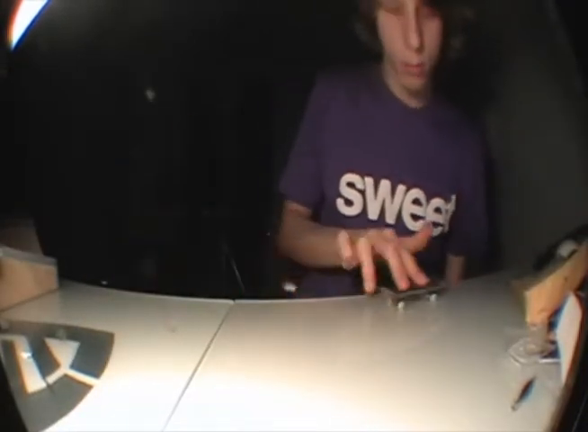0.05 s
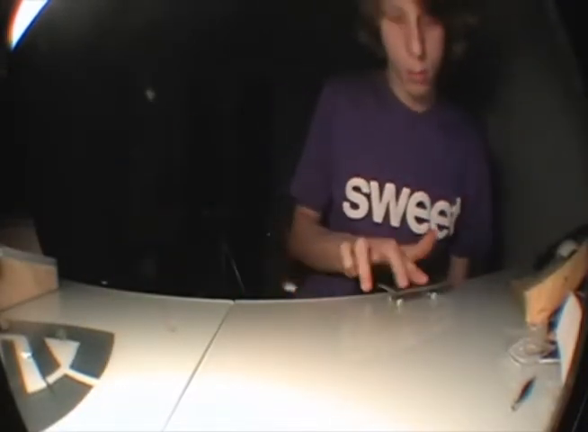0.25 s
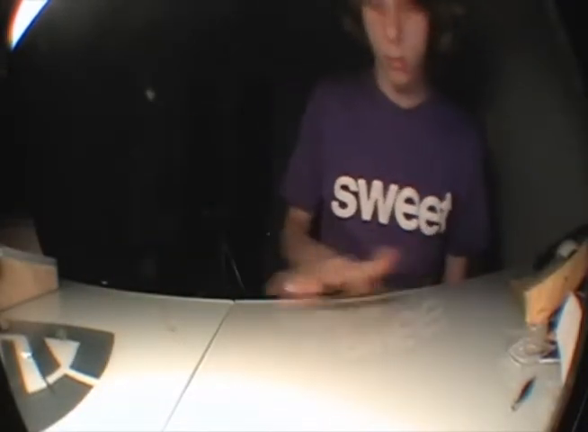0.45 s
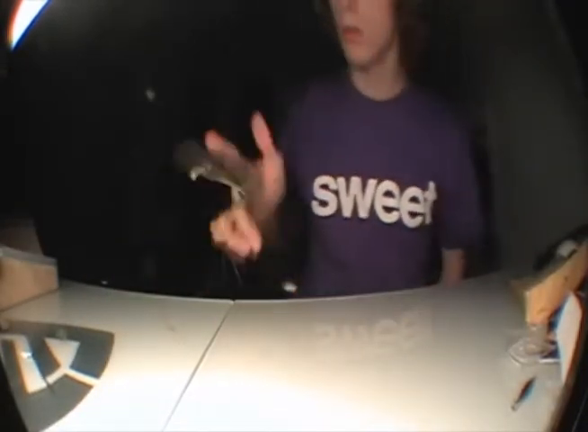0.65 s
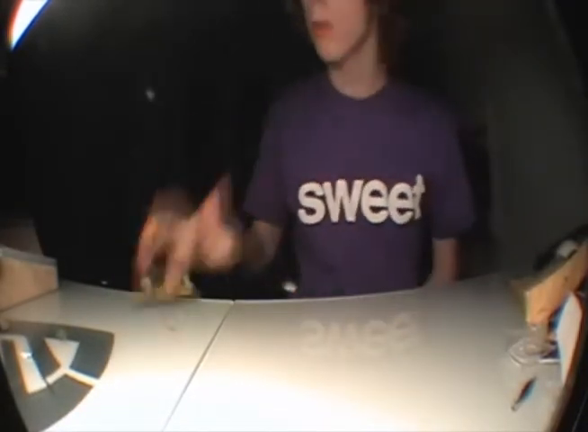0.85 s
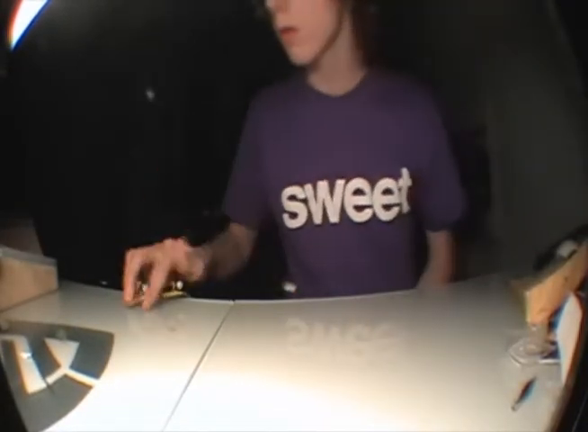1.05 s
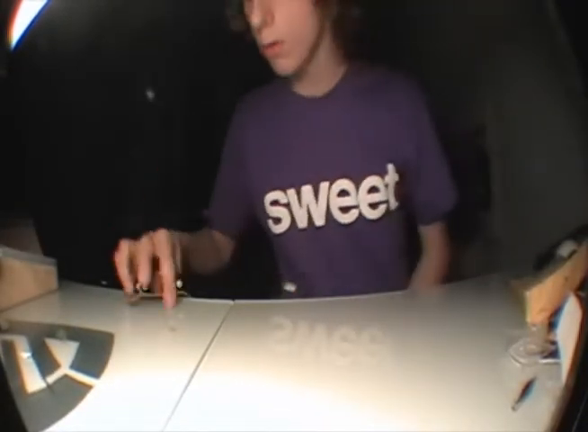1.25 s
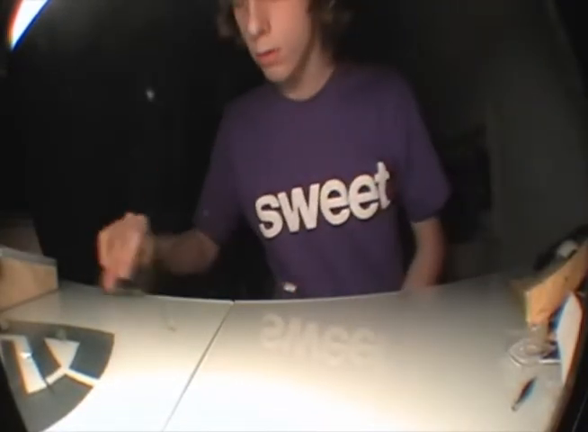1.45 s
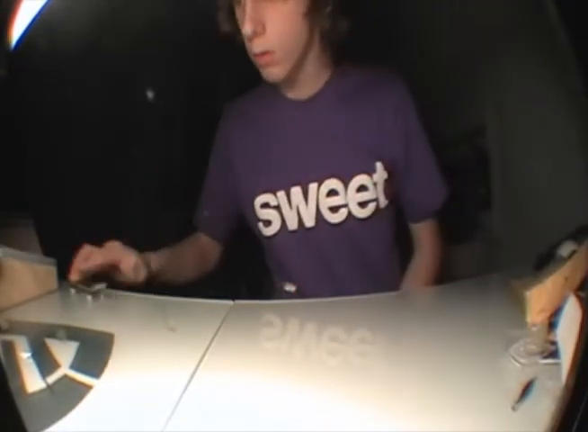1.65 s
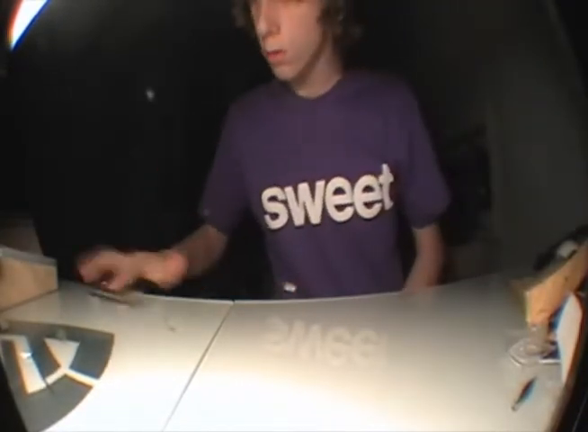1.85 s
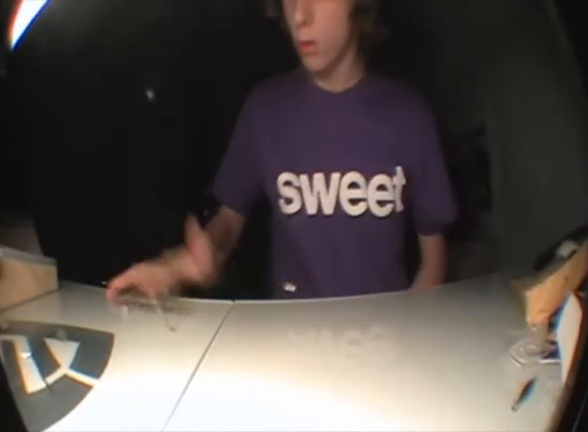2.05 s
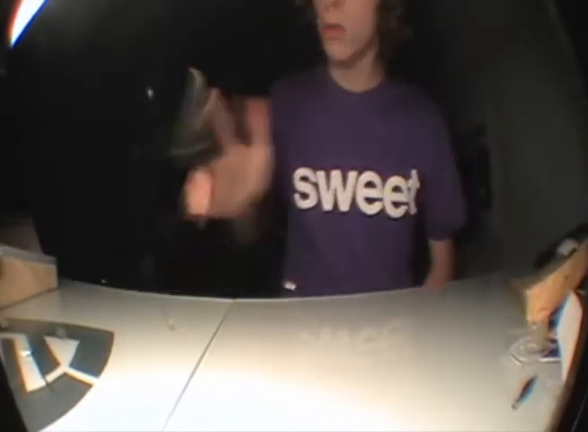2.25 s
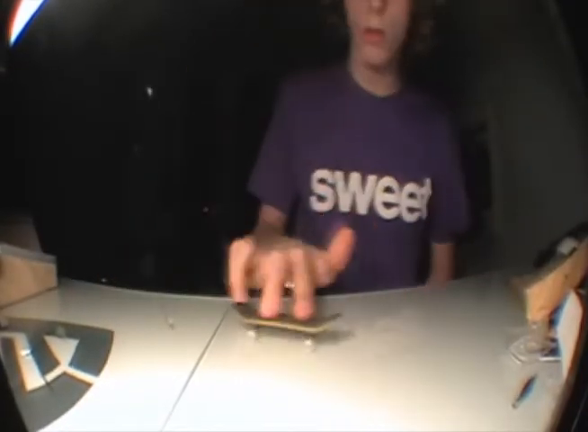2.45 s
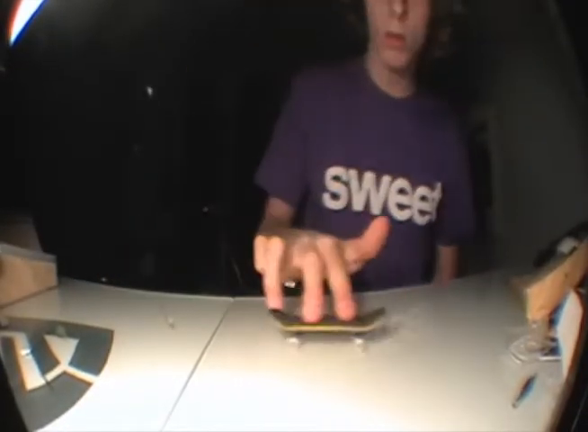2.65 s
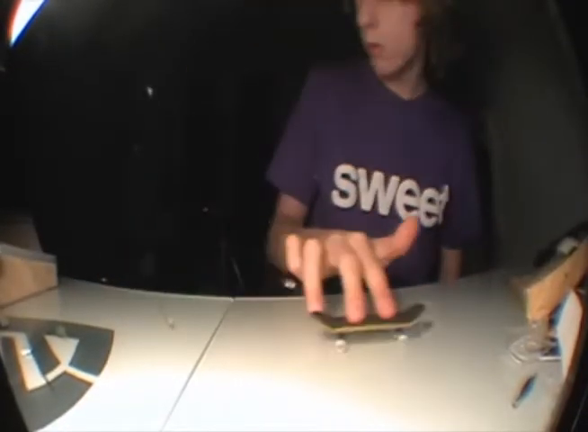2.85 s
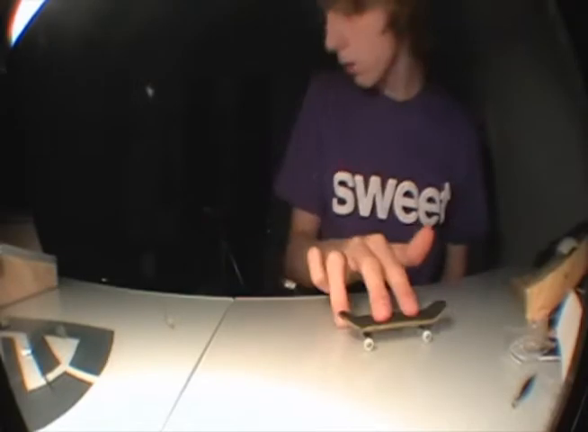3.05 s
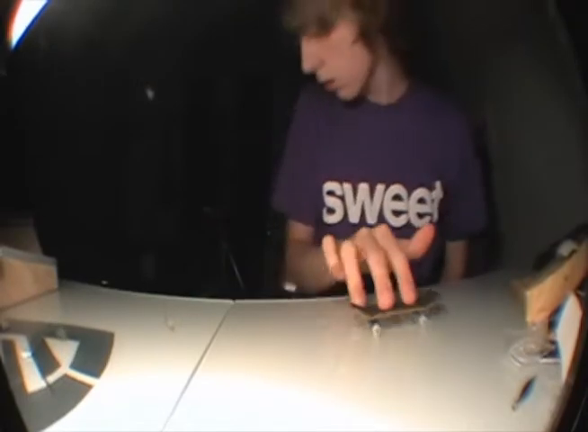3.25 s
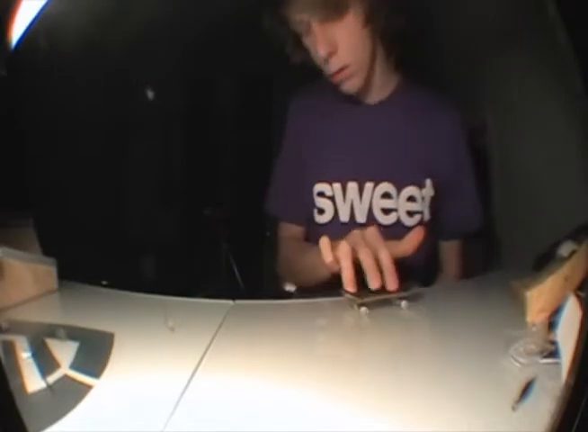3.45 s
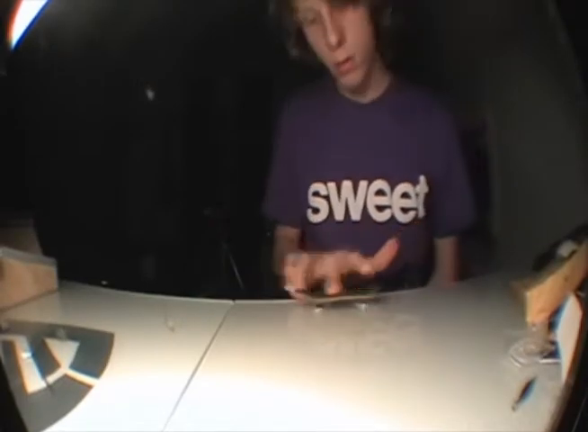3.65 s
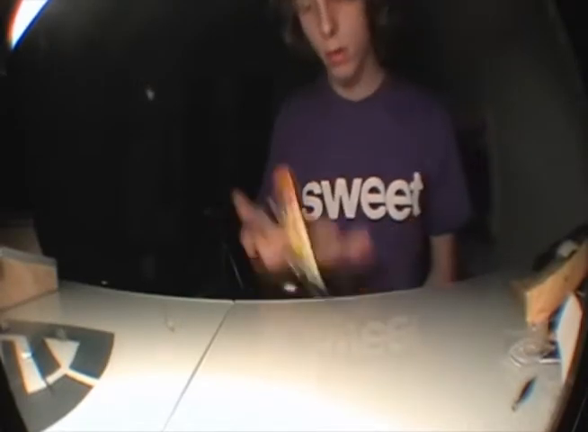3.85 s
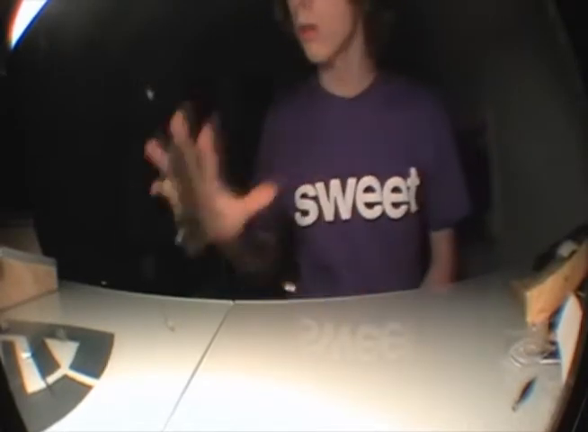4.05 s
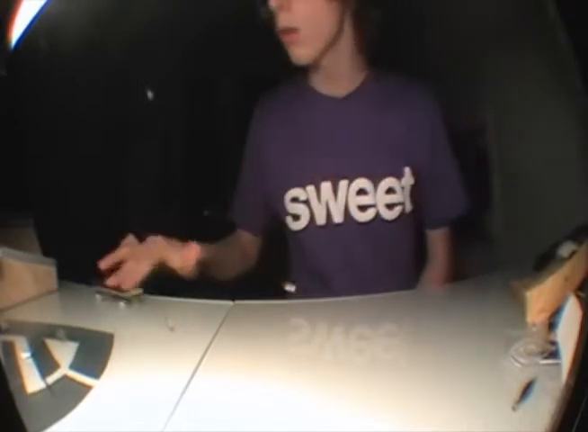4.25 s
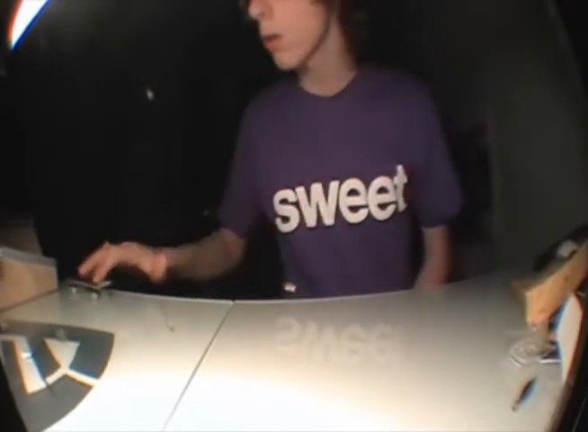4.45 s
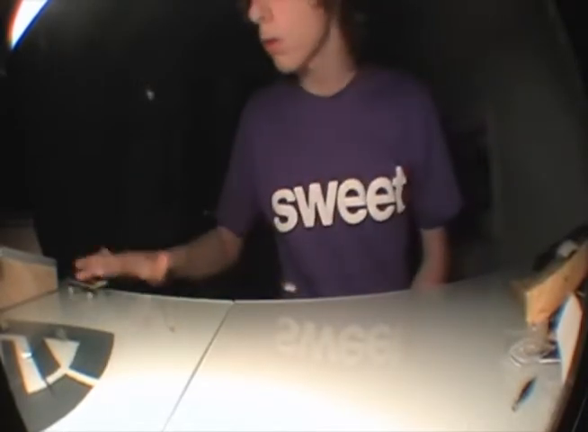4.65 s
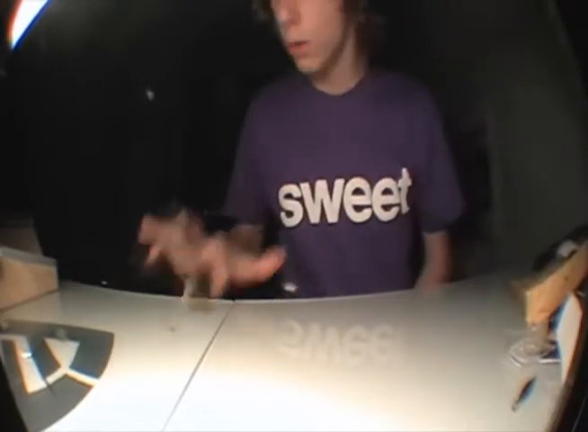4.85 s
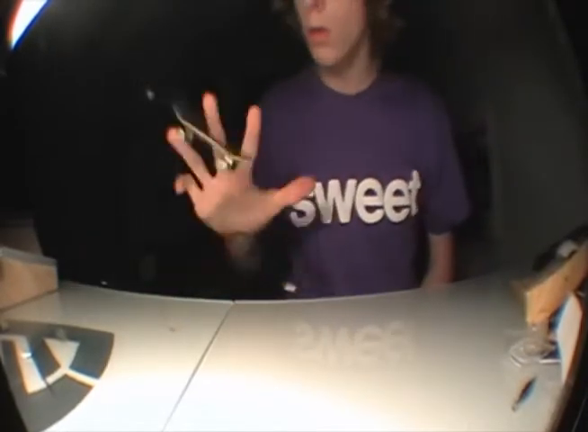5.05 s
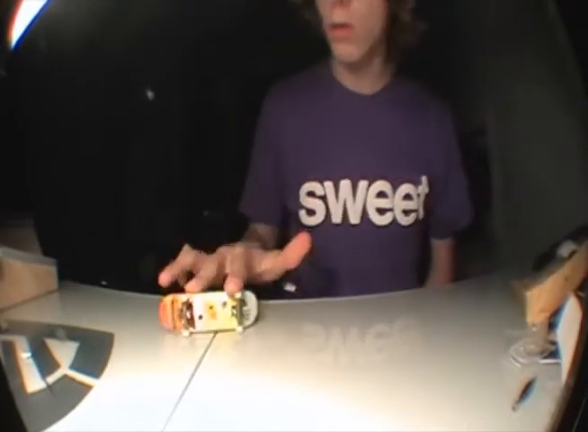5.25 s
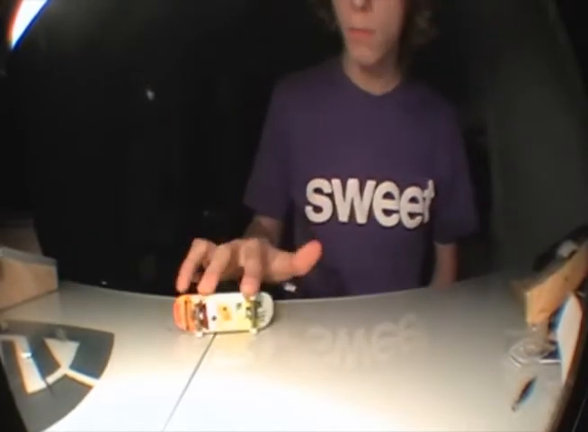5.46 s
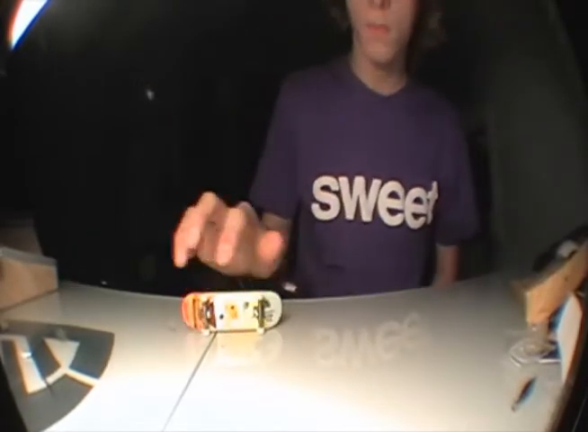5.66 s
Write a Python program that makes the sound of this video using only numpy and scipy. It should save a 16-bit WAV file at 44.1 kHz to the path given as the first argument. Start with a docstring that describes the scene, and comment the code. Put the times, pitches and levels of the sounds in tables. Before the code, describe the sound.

A miniature skateboard is worked by fingers on a hard tabletop, close to the microphone. Wheels growl briefly, swell into a rush, then the tail cracks and the board clatters down. More pops and landings follow, separated by faint rolling and ticking, ending in a hard double clack. A small room answers briefly over a low hum; the loudest hits distort.

```python
"""You hear a tiny skateboard, ridden by two fingers on a tabletop in a small room, close to the microphone.
Its wheels growl and rattle, and rush as the hand speeds up: noise shaped in pitch and loudness.
The wooden tail pops, the board clatters down on its trucks, a palm thumps once and loose parts tick:
ringing tones and noise bursts. The table knocks under the pops and landings, the walls answer,
a low background stays on, and the hardest blows overload the microphone."""
import sys
import numpy as np
from scipy import signal
from scipy.fft import rfft, irfft, next_fast_len
from scipy.io import wavfile
from scipy.ndimage import map_coordinates

SR = 44100
rng = np.random.default_rng(int(sys.argv[2]) if len(sys.argv) > 2 else 0)


def dump(signal):
    """Clip the signal to [-1, 1] and save it as 16-bit WAV at the path in sys.argv[1]."""
    limited = np.clip(np.atleast_2d(signal).T, -1, 1)
    pcm = np.round(limited * 32767).astype(np.int16)
    wavfile.write(sys.argv[1], SR, pcm)


N = 251811
# All dB levels in these tables are relative: the functions below add their own trim to them.

# The wooden deck snaps against the table.
# Each row: start in seconds, overall level in dB, table knock in dB, deck body in dB, crack in dB.
CLACKS = [(0.651, 2, 1, -2, -1), (0.9528, 0.5, -1, 2, 0.5), (0.967, 5.5, 0.5, -1.5, -1.5),
          (0.9733, -4, 2.5, 1.5, -3.5), (0.993, 0.5, 2.5, 3.5, -0.5), (1.6339, -6.5, -2.5, 5.5, -2.5),
          (2.1967, 2, 3, -0.5, -3), (2.201, -6.5, 3.5, 0, -2), (3.9313, 0, -4, 0.5, 0),
          (4.2307, 2.5, 2, 4, 0), (4.9525, -3, 5.5, -10, 0), (5.2967, 2.5, -14, -3, -3.5)]
# Board landings on the trucks (metal axle holders), and one hand-cushioned palm thump at 1.001 s;
# each blow has one leading tone.
# Each row: start in seconds, overall level in dB, table knock in dB, body in dB, crack in dB,
# leading tone in Hz, its level in dB.
SLAMS = [(1.001, -13, 14.5, -4, -5.5, 401, 3), (1.485, -6, 7, -0.5, -1, 738, -9),
         (1.6893, -9.5, -18.5, 0, 1, 1110, -20), (1.692, -12.5, 6, -1.5, 4.5, 1523, -1.5),
         (2.5286, 1, -9.5, 1.5, -2.5, 2455, -5), (2.532, -2, -9.5, 5.5, 9.5, 2330, -4),
         (2.540, -7, -3, -7.5, 2.5, 2173, -3), (4.2611, 3, -6.5, 1, 6.5, 1293, -4.5),
         (4.269, -10.5, 16, -0.5, -1.5, 770, 1.5), (5.2828, -2, 2.5, 1, 4.5, 3630, 5),
         (5.289, -4, 7.5, 8, -8, 766, -14)]
# Loose wheels and hardware tick. Each row: start in seconds, level in dB, deck ring in dB.
TICKS = [(0.0324, -12.5, -3), (0.0812, -8, -1.5), (0.1575, -15, -9), (0.1824, -16, -20),
         (0.4184, -24.5, -8), (1.1982, -29, -14), (1.3259, -35, -11), (1.3922, -31.5, -20),
         (1.5893, -29, -13), (2.4857, -25, -7), (2.9482, -24, -2), (3.3578, -30, 8), (3.3784, -40, -1),
         (3.455, -23.5, 8), (3.5324, -29, -8), (3.6142, -16, -4), (3.6394, -22, 5), (3.6464, -19.5, 1),
         (3.7, -16.5, -6), (3.7219, -17.5, -11), (3.7399, -13.5, -3), (3.7604, -16.5, -5),
         (3.7983, -13.5, -1), (4.4503, -23, 14.5), (5.2345, -28, -13)]
# Fingers and wheels press softly on the table. Each row: start in seconds, level in dB.
BUMPS = [(0.334, -40.5), (1.198, -47), (1.354, -43.5), (1.831, -39), (2.34, -46.5), (2.40, -42.5),
         (2.486, -41), (3.591, -45)]
# The wheels roll: longer pushes, short judders, and the sharp starts of two fast sweeps.
# Each row: start in seconds, length in seconds,
# level at the start in dB, level at the end in dB, deck buzz in dB, rattle in dB.
ROLLS = [(0.0, 0.19, -27.5, -33, -8.5, -2), (0.326, 0.062, -47.5, -48.5, -11, -5),
         (0.43, 0.076, -37, -33, -10, -5.5), (1.203, 0.3, -76, -62, -2, 9),
         (1.861, 0.035, -32, -31, -8, -6), (2.653, 0.39, -41.5, -44.5, -10.5, -8),
         (3.118, 0.16, -62.5, -54.5, -5.5, -4), (3.277, 0.053, -44, -48, -8, -3),
         (3.36, 0.089, -43, -47.5, -10.5, 0.5), (3.457, 0.006, -33.5, -38.5, -7.5, -8),
         (3.501, 0.15, -46.5, -34, -9.5, -5), (3.737, 0.068, -31, -25, -11.5, -7.5),
         (4.317, 0.14, -28, -32.5, -6.5, -8.5), (4.531, 0.034, -36, -37.5, -9.5, -12),
         (4.682, 0.09, -68.5, -53.5, -5, -4.5), (4.8, 0.025, -32.5, -32, -6, -9.5),
         (5.498, 0.15, -62.5, -73.5, -1.5, 6.5)]
# The hand sweeps the board up to speed for a trick.
# Each row: start in seconds, length in seconds, growl in dB, deck buzz in dB, hiss in dB.
SWEEPS = [(0.486, 0.16, -22, -21, -16.5), (1.856, 0.26, -23.5, -25, -26.5), (2.112, 0.072, -32.5, -27, -29),
          (3.913, 0.025, -31, -29.5, -22), (4.793, 0.17, -25, -21, -21)]

# Ringing tones of the tabletop, the deck (low and high) and the trucks. Each row: pitch in Hz,
# level in dB, time to fade by 60 dB in seconds (before the extra damping of each blow).
TABLE_TONES = [(159, -0.5, 0.092), (233, -4.5, 0.084), (335.8, 1.5, 0.088), (411, 1, 0.099),
               (480, -1, 0.071), (576, -1, 0.11), (736, -9.5, 0.14)]
DECK_TONES = [(1147, 3, .05), (1429, 7, .05), (1550, -3.5, 0.015), (1900, -8, 0.01), (2160, 2, .03),
              (2760, -12.5, 0.018)]
DECK_TOP_TONES = [(3312, 7, 0.016), (3740, 5.5, 0.016), (4460, 4, 0.031), (5900, -13, 0.012),
                  (5875, 12, 0.011), (7030, 8.5, 0.011), (7800, -3, 0.018), (8060, -19.5, .012)]
TRUCK_TONES = [(540, -3.5, 0.052), (702, 0, 0.054), (1171, 0, 0.022), (1200, 0.5, 0.076),
               (1419, 3.5, 0.034), (1907, 2.5, 0.047), (2041, 0.5, 0.0084), (2330, -7.5, 0.17),
               (2800, -8.5, 0.027), (3606, 0, 0.052)]

# Noise colours of the contacts: bright crack, dull thud, soft bump. Each row: pitch in Hz, level in dB.
CRACK = [(100, -43), (900, -12.5), (2500, -10), (3700, -3), (6200, 2.5), (8500, -1.5), (10500, -6),
         (15000, -8.5)]
THUD = [(25, -32.5), (60, -15), (150, -7), (400, -8.5), (1200, 3), (2400, 5), (4000, -8.5), (9000, -22),
        (16000, -35.5)]
SOFT = [(40, -29.5), (110, 0.5), (170, 2.5), (260, -9.5), (420, -9.5), (800, -23), (3000, -48)]
# Noise colours of the wheels and deck in motion. Each row: pitch in Hz, level in dB.
GROWL = [(100, -42), (450, -20), (700, -9), (880, -14.5), (1120, 3), (1200, -3.5), (1290, 3.5), (1420, -6),
         (1530, 1.5), (1750, -7), (2100, -28), (2800, -31.5), (5000, -47.5)]
BUZZ = [(1200, -33.5), (1650, -9), (1850, -1.5), (2150, -1.5), (2500, -10), (2900, -9), (4000, -36)]
RATTLE = [(1500, -32), (2900, -15), (3300, -9), (3750, 1), (4100, -2), (4450, 0), (5100, -10), (5850, 1),
          (6500, -7), (7400, -4), (8600, -14), (9600, -14), (11000, -21), (15000, -30)]
RUSH = [(100, -29.5), (400, -22.5), (750, -9.5), (950, -10.5), (1120, -1), (1380, 2.5), (1600, -2),
        (1900, -14), (3000, -29), (8000, -48)]
HISS = [(1500, -35.5), (2700, -5), (3800, 3.5), (5000, 1), (6200, 1), (8000, -3), (10000, -16),
        (12500, -12.5), (15500, -36.5)]
# Noise colours of the background: broad floor and narrow drone. Each row: pitch in Hz, level in dB.
FLOOR = [(25, 8), (60, -3), (100, 2), (130, -5.5), (165, 0.5), (200, -4), (330, -3), (600, -14.5),
         (1300, -15.5), (3000, -27.5), (7000, -27.5), (11000, -32.5), (16000, -42)]
HUM = [(145, -59), (160, -2), (166, 1.5), (172, -1), (190, -58)]

# How long the walls ring. Each row: pitch in Hz, time to fade by 60 dB in seconds.
WALLS = [(100, .39), (400, .25), (1500, .27), (5000, .26), (9000, .215), (15000, .18)]
# How much the walls throw back. Each row: pitch in Hz, level in dB.
ECHO = [(100, -6.5), (400, 0), (800, 0), (1400, -2), (3000, -4.5), (6500, -2.5), (10000, -4.5), (15000, -5)]
# Stereo difference signal. Each row: pitch in Hz, level in dB.
WIDTH = [(25, -6), (60, -11), (125, -17), (250, -20), (1300, -20), (2500, -15), (5000, -14), (9000, -9),
         (15000, -7)]
# Phase difference between the two microphone ports. Each row: pitch in Hz, angle in radians.
TWIST = [(9500, 0), (11000, 2.2), (15000, 2.5)]
# Loudness of left over right. Each row: pitch in Hz, difference in dB.
LEAN = [(700, .4), (4400, -.5), (8000, -1.3), (12000, -3)]

TOP_HZ = 15300  # the microphone's upper band limit
ROLL_ATTACK_S, COAST_DB_PER_S = 0.024, 285.5  # a roll takes hold quickly; after it the wheels run out
UNEVEN_DB, UNEVEN_PER_S = 1.07, 22  # the finger pressure wavers
GROWL_POWER, BUZZ_POWER, HISS_POWER = 1.1, 1.5, 2.1  # each layer grows as this power of the speed
FASTEST_SHARE = 0.65  # the top speed comes this far through a sweep
AGE = np.arange(SR // 4) / SR  # time since a contact, in seconds


def amp(db):
    """Turn decibels into a plain multiplier."""
    return 10 ** (np.asarray(db) / 20)


def unit(x):
    """Scale to an average (rms) level of 1."""
    return x / np.sqrt(np.mean(x ** 2) + 1e-20)


def packet(x):
    """Scale to the energy of one millisecond at full level."""
    return x / np.sqrt(np.sum(x ** 2) * 1000 / SR + 1e-20)


def along(points, hz):
    """Read a curve of (Hz, value) points on a logarithmic pitch axis."""
    point_hz, values = np.transpose(points)
    return np.interp(np.log(hz + 1), np.log(point_hz + 1), values)


def filtered(x, response):
    """Multiply the spectrum of x by a response that depends on frequency."""
    length = x.shape[-1]
    padded = next_fast_len(length + 8192)
    spectrum = rfft(x, padded) * response(np.fft.rfftfreq(padded, 1 / SR))
    return irfft(spectrum, padded)[..., :length]


def coloured(x, spectrum):
    """Give x a noise colour, at rms 1."""
    return unit(filtered(x, lambda hz: amp(along(spectrum, hz))))


def wobble(rate):
    """A smooth random curve with this many random points a second."""
    points = rng.standard_normal(int(N * rate / SR) + 4)
    return map_coordinates(points, [np.arange(N) * rate / SR])


def grit(depth_db, rate):
    """Noise in tiny clumps: its level wavers at random, like rough ground under wheels."""
    return rng.standard_normal(N) * amp(depth_db * wobble(rate))


def add(track, s, sound):
    """Lay a sound into the track at time s."""
    part = track[round(s * SR):][:len(sound)]
    part += sound[:len(part)]


def bands(x):
    """Split into a short-time spectrum."""
    return signal.stft(x, SR, nperseg=256)[2]


def waveform(z):
    """Turn a short-time spectrum back into sound."""
    return signal.istft(z, SR, nperseg=256)[1]


def ring(modes, damping, scatter_db=2):
    """Fading tones, stirred differently by every blow; shifting fingers blur their pitch."""
    hz, db, t60 = np.transpose(modes)[:, :, None]
    life = t60 / max(damping, .8)
    size, detune, phase = rng.standard_normal((3, len(modes), 1))
    drift = np.cumsum(rng.standard_normal((len(modes), len(AGE))), 1) / np.sqrt(life * SR)
    cycles = hz * (1 + .008 * detune) * AGE + phase + .25 * drift
    levels = amp(db + scatter_db * size - 60 * AGE / life)
    tones = np.sum(levels * np.sin(2 * np.pi * cycles), 0)
    return packet(tones * (1 - np.exp(-AGE / 0.00021)))  # a very short rise


def burst(spectrum, t60, chatter_db, chatter_t60):
    """The dense, quickly damped vibration of a contact and the weaker chatter after it."""
    decay = amp(-60 * AGE / t60) + amp(chatter_db - 60 * AGE / chatter_t60)
    noise = coloured(rng.standard_normal(len(AGE)), spectrum)
    return packet(noise * decay * (1 - np.exp(-AGE / 0.00034)))


def background():
    """A low, slowly wavering noise floor and a narrow drone in the room."""
    floor = coloured(grit(depth_db=3.0, rate=8.4), FLOOR)
    hum = coloured(rng.standard_normal(N), HUM)
    return amp(-54.0) * floor + amp(-64) * hum


def room(x, arrival=0.027, early_db=-7):
    """Weak near reflections, then the walls: echoes redrawn every third of a second, and a diffuse treble."""
    hz, age, _ = signal.stft(np.zeros(SR // 2), SR, nperseg=256)
    # reflections before the arrival time (s) are held down by early_db
    onset = np.clip(age / 0.0024, 0, 1) * amp(early_db * np.clip((arrival - age) / .004, 0, 1))
    decay = onset * amp(-60 * age / along(WALLS, hz)[:, None])
    decay = decay / np.linalg.norm(decay, axis=1, keepdims=True)
    decay = decay * amp(along(ECHO, hz))[:, None]
    # share of the echo energy that is diffuse, rising with pitch
    diffuse = along([(400, 0), (1200, .3), (3000, .5)], hz)[:, None]
    echoes, step = np.zeros(N), SR // 3
    for start in range(0, N, step):
        tail = waveform(bands(rng.standard_normal(SR // 2)) * decay * np.sqrt((1 - diffuse) / 128))
        add(echoes, start / SR, signal.fftconvolve(x[start:start + step], tail))
    # the diffuse part is noise that follows the smeared energy of the sound
    noise = bands(rng.standard_normal(N))
    energy = signal.fftconvolve(np.abs(bands(x)) ** 2, diffuse * decay ** 2, axes=1)
    energy = energy[:, :noise.shape[1]]
    return echoes + waveform(noise / noise.std() * np.sqrt(np.abs(energy)))[:N]


def soft_bumps():
    """Soft presses on the table: low, dull noise bursts."""
    out = np.zeros(N)
    for s, db in BUMPS:
        add(out, s, amp(db + 7) * burst(SOFT, t60=.06, chatter_db=-14.0, chatter_t60=.2))
    return out


def ticks():
    """Light contacts of wheels and axles: a bright click and a little deck ring."""
    out = np.zeros(N)
    for s, db, body_db in TICKS:
        click = burst(RATTLE, t60=.016, chatter_db=-24, chatter_t60=.03)
        body = amp(body_db - 1) * ring(DECK_TONES, damping=0.92)
        add(out, s, amp(db - 7.5) * (click + body))
    return out


def roll_gains():
    """Gains of growl, buzz and rattle: each roll takes hold, gathers or loses pace, and coasts out."""
    gains = np.zeros((3, N))
    for start, length, first_db, last_db, buzz_db, rattle_db in ROLLS:
        age = np.arange(N) / SR - start
        attack = np.clip(1 + age / ROLL_ATTACK_S, 0, 1)  # full at the start time
        pace_db = np.interp(age, [0, length], [first_db, last_db])
        coast_db = COAST_DB_PER_S * np.maximum(age - length, 0)
        pace = attack * amp(pace_db - coast_db)
        gains = np.maximum(gains, np.outer(amp([0, buzz_db, rattle_db]), pace))
    return gains * amp(UNEVEN_DB * wobble(UNEVEN_PER_S))


def rolling(turn_hz=66, knock_db=16):
    """Wheels growl through the deck and rattle on their axles once a turn."""
    growl, buzz, rattle = roll_gains()
    turn = np.cumsum(turn_hz * amp(wobble(5) / 2)) / SR % 1  # 0 to 1 within each turn
    knocks = amp(-knock_db * turn) + amp(-18)  # a jolt each turn over a steady rub
    bumps = np.sqrt(knocks) * amp(1.8 * wobble(130))
    low = coloured(rng.standard_normal(N) * bumps, GROWL)
    middle = coloured(rng.standard_normal(N) * bumps, BUZZ)
    high = coloured(grit(depth_db=0.5, rate=100) * knocks, RATTLE)
    return amp(-0.5) * growl * low + amp(-1.0) * buzz * middle + amp(-2.0) * rattle * high


def sweep_gains():
    """Gains of growl, buzz and hiss: the speed swells and drops in an arch, and faster is brighter."""
    gains = np.zeros((3, N))
    for start, length, *levels_db in SWEEPS:
        progress = np.linspace(0, 1, round(length * SR))
        speed = np.sin(np.pi / 2 * np.interp(progress, [0, FASTEST_SHARE, 1], [0, 1, 0]))
        for gain, db, power in zip(gains, levels_db, (GROWL_POWER, BUZZ_POWER, HISS_POWER)):
            add(gain, start, amp(db) * speed ** power)
    return gains


def run_ups():
    """At speed the bumps merge into a broad rush, and the pressed deck buzzes."""
    growl, buzz, hiss = sweep_gains()
    low = coloured(grit(depth_db=2.5, rate=200), RUSH)
    middle = coloured(grit(depth_db=2.0, rate=350), BUZZ)
    high = coloured(grit(depth_db=2.3, rate=400), HISS)
    return amp(-0.8) * growl * low + amp(-2.05) * buzz * middle + amp(-0.5) * hiss * high


def slams():
    """Landings on the trucks and one palm thump: a fuller, lower and longer blow than a clack."""
    out = np.zeros(N)
    for s, db, knock_db, body_db, crack_db, lead_hz, lead_db in SLAMS:
        crack = amp(crack_db - 1.0) * burst(CRACK, t60=0.018, chatter_db=-14, chatter_t60=0.068)
        thud = burst(THUD, t60=0.0058, chatter_db=-18.5, chatter_t60=0.052)
        body = amp(-4.5) * ring(TRUCK_TONES, damping=1.95) + amp(-0.5) * thud
        lead = amp(lead_db) * ring([(lead_hz, 0, 45 / lead_hz)], damping=1)  # fades over 45 cycles
        knock = amp(knock_db - 15.0) * ring(TABLE_TONES, damping=1.6)
        add(out, s, amp(db - 1.5) * (crack + amp(body_db) * body + knock + lead))
    return out


def clacks():
    """Wood on the tabletop: a bright crack, the deck's short ring and a knock of the table."""
    out = np.zeros(N)
    for s, db, knock_db, body_db, crack_db in CLACKS:
        snap = burst(CRACK, t60=.006, chatter_db=-20, chatter_t60=.04)
        crack = snap + amp(-1) * ring(DECK_TOP_TONES, damping=1.7)
        thud = burst(THUD, t60=0.0087, chatter_db=-18, chatter_t60=0.065)
        body = amp(-15) * ring(DECK_TONES, damping=0.94) + amp(-13.0) * thud
        knock = amp(knock_db - 14.5) * ring(TABLE_TONES, damping=1.0)
        add(out, s, amp(db - 4.0) * (amp(crack_db) * crack + amp(body_db) * body + knock))
    return out


def ports(x):
    """Two close ports: most alike from 250 to 1300 Hz, wider in the deepest bass and in the treble."""
    scatter = rng.standard_normal(len(AGE)) * amp(-60 * AGE / .06)
    side = signal.fftconvolve(x, scatter / np.linalg.norm(scatter))[:N]
    side = filtered(side, lambda hz: amp(along(WIDTH, hz)))
    half = np.array([[.5], [-.5]])  # each port takes half of every difference

    def port_response(hz):
        return amp(half * along(LEAN, hz)) * np.exp(1j * half * along(TWIST, hz))

    return filtered(np.array([x + side, x - side]), port_response)


def scene():
    """The board in its room, over a low steady background."""
    board = soft_bumps() + ticks() + rolling() + run_ups() + slams() + clacks()
    return ports(background() + amp(-7.5) * room(board) + board)


def record(dry, bass_hz=76):
    """The small microphone flattens the hardest blows, loses deep bass and stops at its band limit."""
    clipped = dry / (1 + np.abs(dry / .82) ** 5) ** (1 / 5)  # never passes 0.82
    thin = signal.sosfilt(signal.butter(2, bass_hz, "high", fs=SR, output="sos"), clipped)
    return filtered(thin, lambda hz: 1 / np.sqrt(1 + (hz / TOP_HZ) ** 100))


dry = scene()
out = record(dry)
dump(out)
```